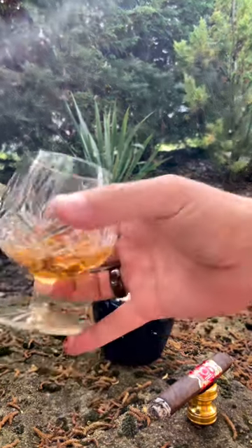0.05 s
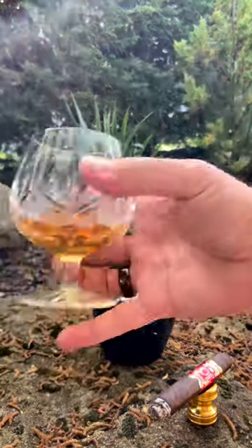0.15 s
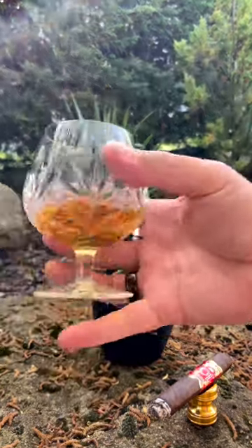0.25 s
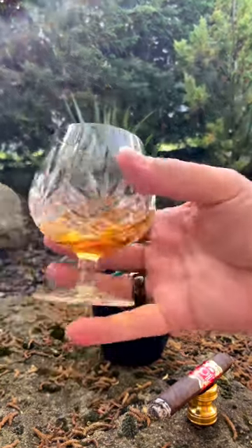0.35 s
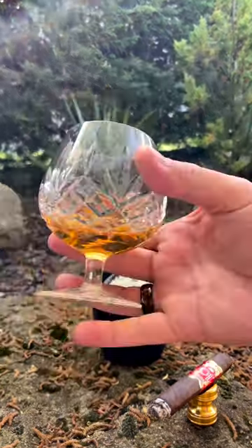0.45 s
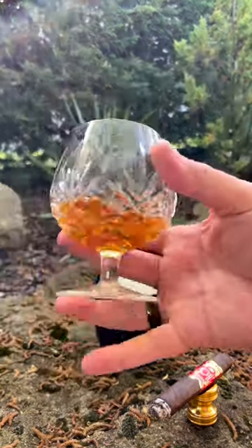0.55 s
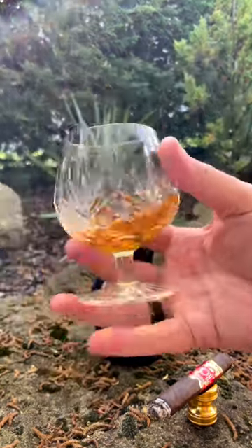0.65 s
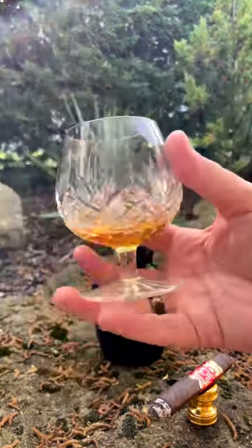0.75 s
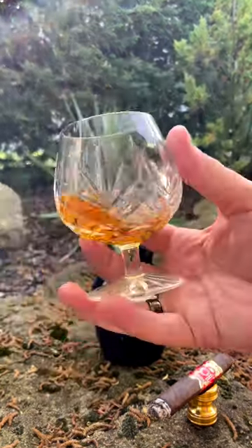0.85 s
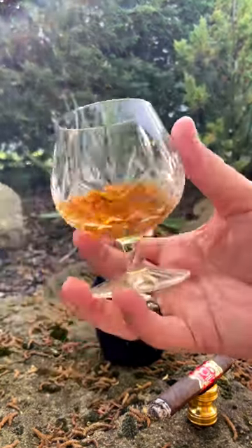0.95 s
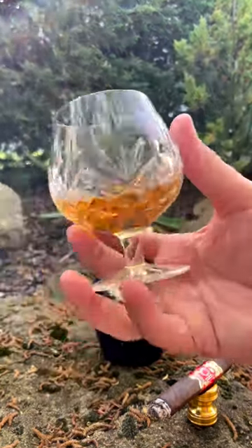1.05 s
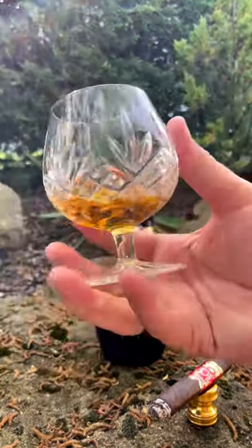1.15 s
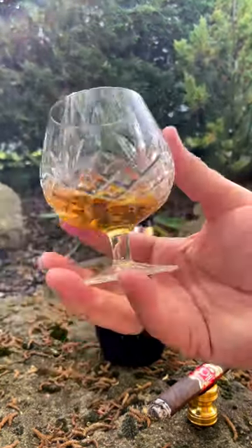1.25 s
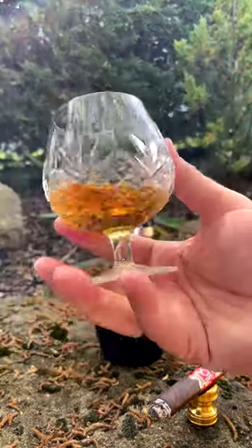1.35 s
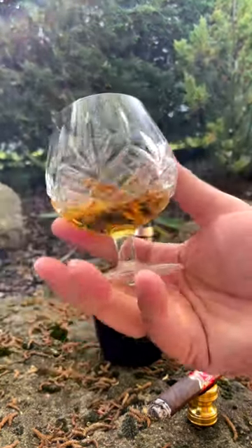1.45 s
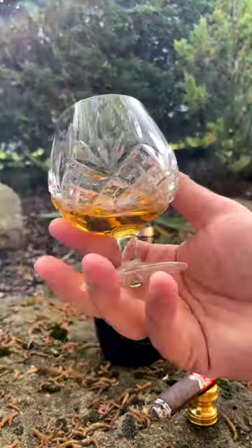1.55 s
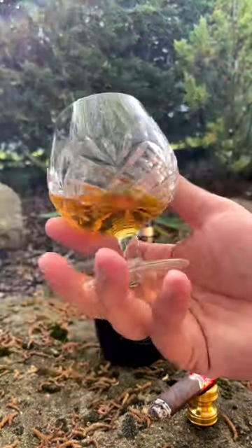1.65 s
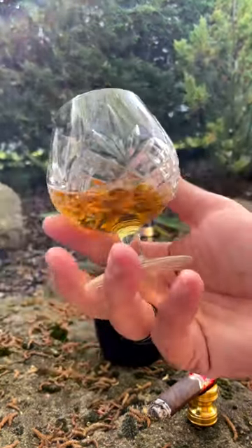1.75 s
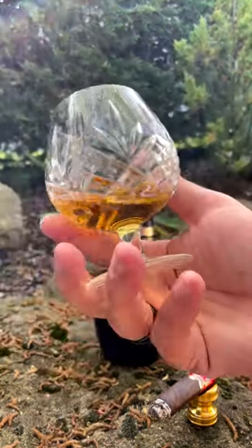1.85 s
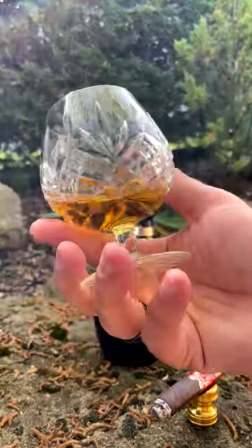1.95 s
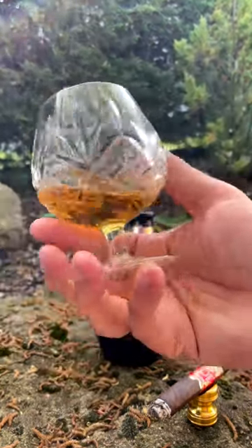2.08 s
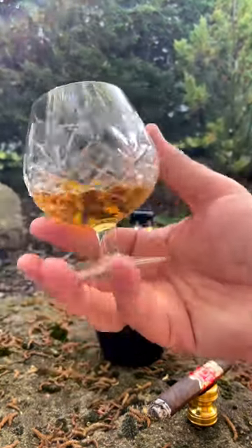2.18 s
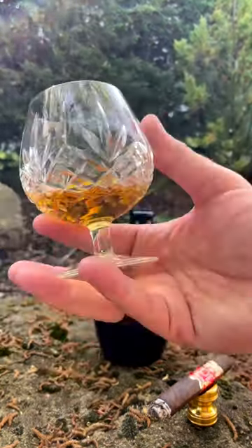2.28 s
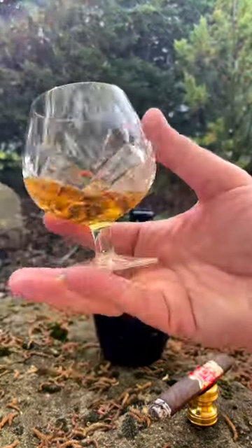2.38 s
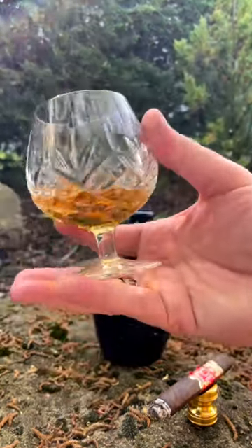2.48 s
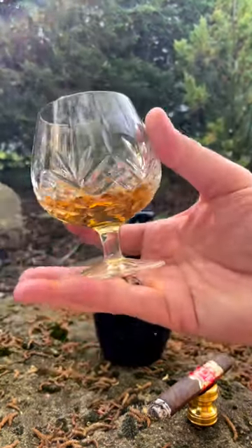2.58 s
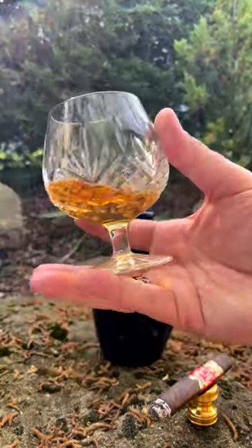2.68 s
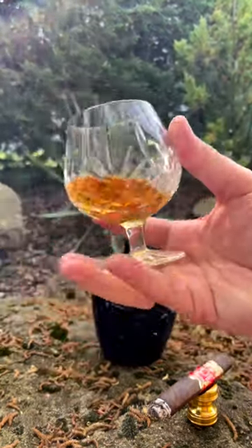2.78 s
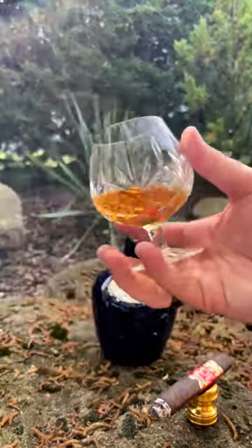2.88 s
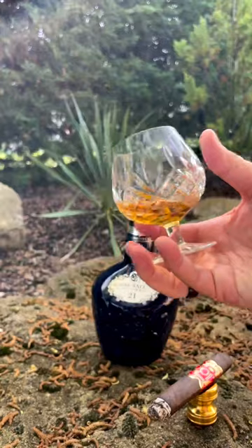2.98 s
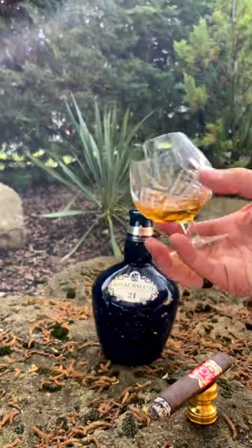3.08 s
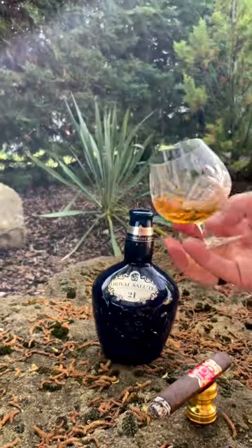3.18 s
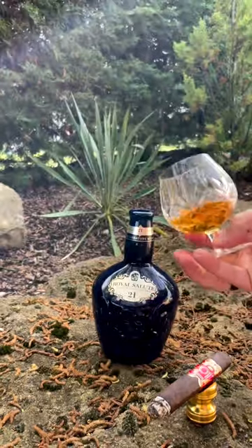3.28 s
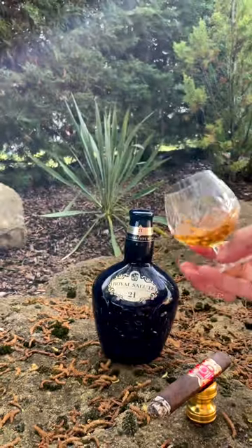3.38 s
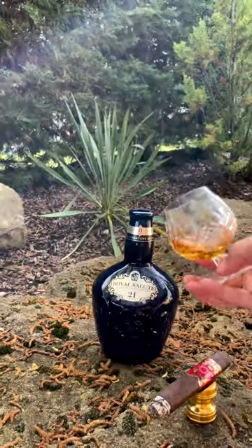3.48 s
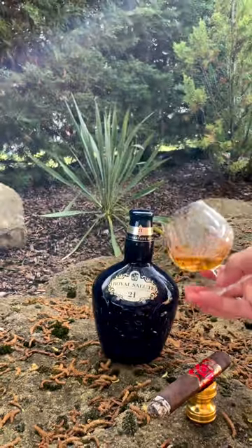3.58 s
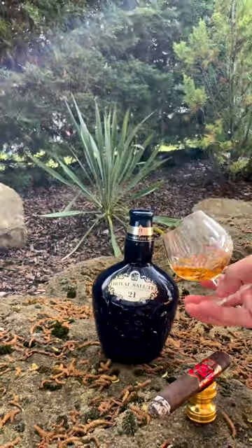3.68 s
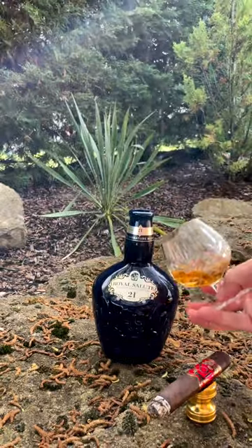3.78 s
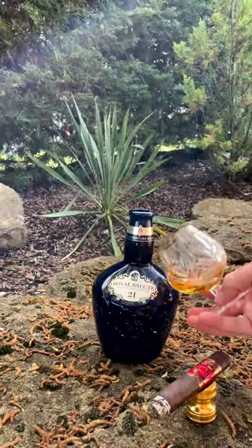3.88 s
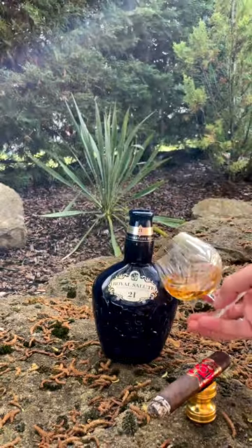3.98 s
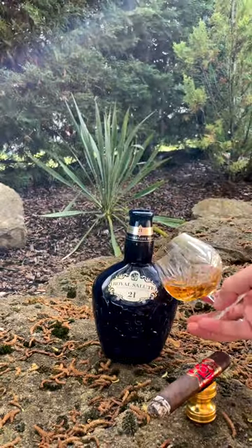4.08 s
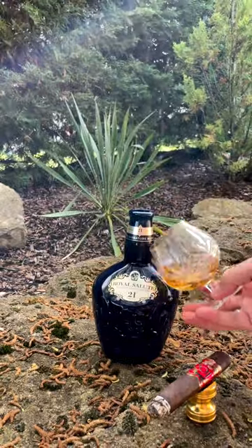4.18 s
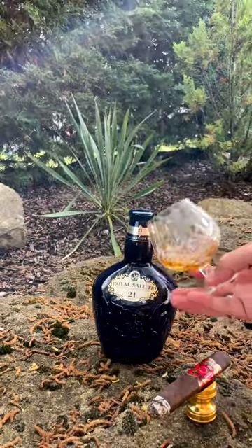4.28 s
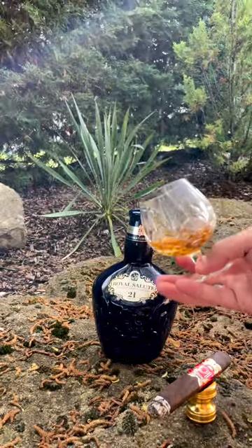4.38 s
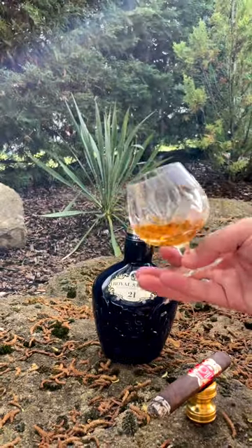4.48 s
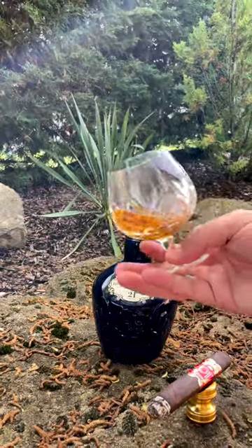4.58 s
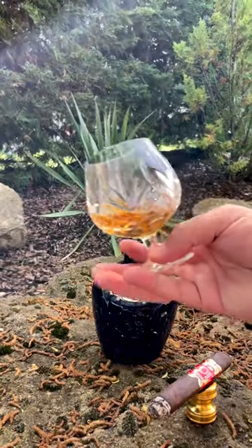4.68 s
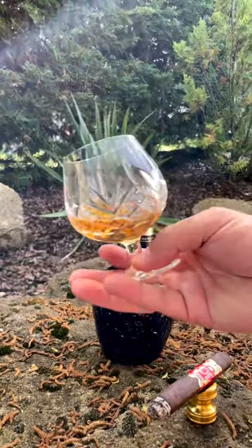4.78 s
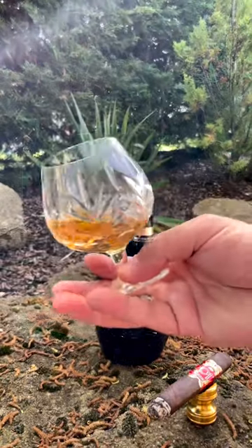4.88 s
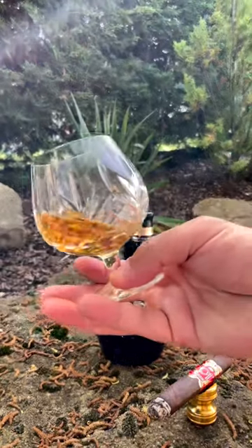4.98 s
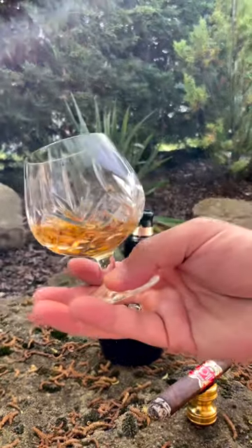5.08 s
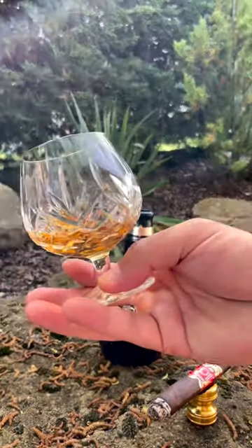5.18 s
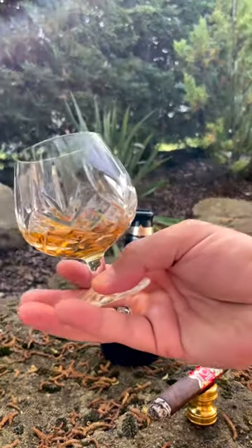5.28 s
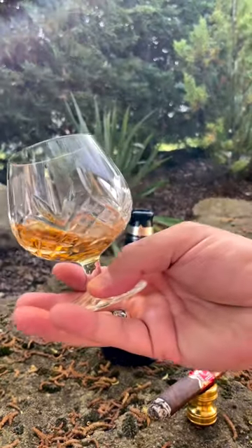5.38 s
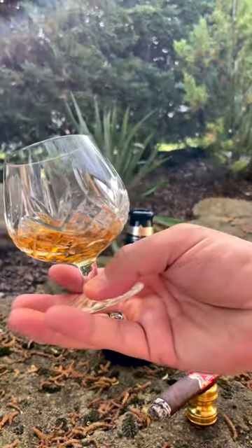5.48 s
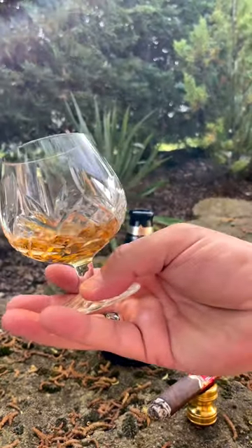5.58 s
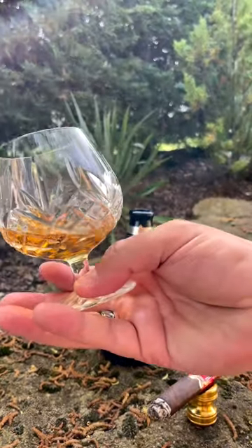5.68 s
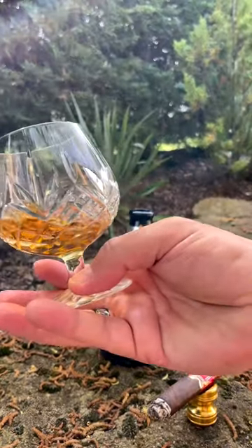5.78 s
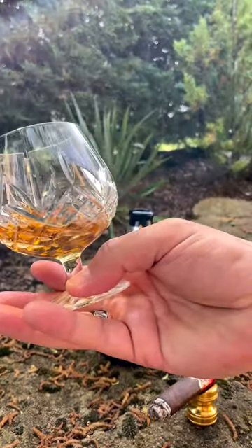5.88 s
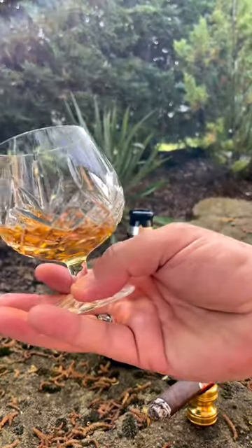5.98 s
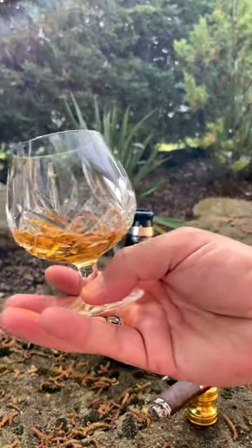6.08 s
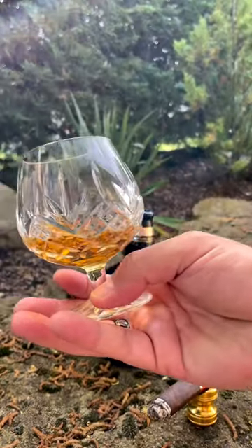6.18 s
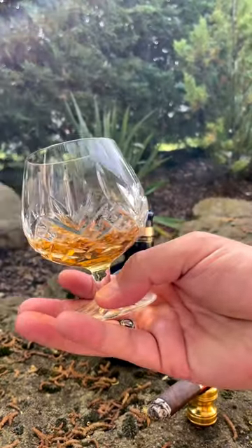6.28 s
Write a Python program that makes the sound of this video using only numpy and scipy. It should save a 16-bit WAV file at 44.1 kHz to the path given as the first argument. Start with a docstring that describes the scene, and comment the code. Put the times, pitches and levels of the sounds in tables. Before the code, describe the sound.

For the first four seconds there is only quiet garden ambience: a low rumble, two distant motors humming, and faint, falling, warbled bird notes, clearest around 0.5, 1.8 and 3.2 seconds. A hand brushes softly close to the microphone now and then. At 4 seconds a crystal glass holding a little whisky strikes a full bottle, giving two sharp, bright clinks in very quick succession and a much weaker third touch. This is by far the loudest moment. The glass then rings with a clear, high tone whose pitch dips slightly as the drink sloshes. The ring pulses and shifts between left and right, its upper overtones fading first while the main tone lasts to the end, a little after 6 seconds. From about 5 seconds, fingers rustle and tick lightly on the stem, with the clearest tick just before the end.

```python
"""A garden opens with low rumble, two far motors, warbling birds and the soft rustle of a hand.
At 4 s a crystal snifter holding a little whisky strikes a bottle and rebounds twice; each impact
excites the normal modes of both. The drink surges up the wall, and its added mass bends the pitch down.
The bowl rings on, two close modes beating from ear to ear as the hand rolls it and brings it near.
Last, fingers tick on the stem while the tone decays."""
import sys
import numpy as np
from scipy import signal
from scipy.fft import rfft, irfft
from scipy.io import wavfile
from scipy.ndimage import uniform_filter1d

SR = 44100
rng = np.random.default_rng(int(sys.argv[2]) if len(sys.argv) > 2 else 0)


def dump_mix(stems):
    """Bounce the given channels to the path in sys.argv[1] as a 16-bit WAV at rate SR."""
    frames = np.atleast_2d(stems).T  # one column per channel
    limited = np.clip(frames, -1, 1)  # hard clip at full scale
    pcm = np.round(limited * 32767).astype(np.int16)
    wavfile.write(sys.argv[1], SR, pcm)


N = 279594
TIME = np.arange(N) / SR

# glass meets bottle: (time [s], click [dB], knock [dB], knock frequency [Hz], knock t60 [s],
# crack [dB], rattle [dB], rattle t60 [s])
IMPACTS = [(4.0073, -7, -10, 3550, 0.010, -9.5, -38, .2), (4.0609, -9, -7, 1500, 0.005, -31, -25.5, .07),
           (4.1167, -32, -29, 3650, 0.014, -52, -45, .08)]
# bowl: (frequency [Hz], t60 [s], level at impact 1 [dB], at 2 [dB], at 3 [dB],
# pitch drop at full slosh [fraction], left minus right [dB])
BOWL_MODES = [(1205.5, 8.93, -23.5, -48, -55, 0.022, -1.5), (1912, 0.48, -62, -54, -59, .012, -0.5),
              (2906.7, 2.62, -35.5, -25.8, -37, .0172, 0.4), (4131, .24, -58, -46, -66, .004, 3),
              (4191, .4, -60, -50, -54, .003, 1), (4314, .48, -58, -57, -53, .002, 3),
              (4775, .1, -52, -55, -50, .003, 0), (5205, .88, -35.5, -41.5, -51, 0.014, 3),
              (5815, .075, -52, -36, -42, .006, -0.6), (6235, .26, -56, -50, -48, .022, 0),
              (6320, .21, -42, -48, -51, .024, -2.5), (7620, .08, -44, -41, -49, .012, 0),
              (7925, .19, -39, -30.5, -39, .018, -1), (8897, .14, -33, -36, -58, .001, -0.5),
              (9229, .3, -58, -53, -60, .001, 0), (9630, .08, -25, -33, -41, .002, 0),
              (10620, .105, -19.5, -29, -31, .046, 0.5), (11230, .07, -21.5, -32, -38, .005, 2),
              (11520, .13, -29, -40, -50, .01, -1.5), (11720, .1, -40, -26, -44, .01, 2),
              (12020, .09, -38, -38, -32, .01, 0), (12750, .08, -32, -33, -50, .001, -1.5)]
# the drink thrown up the wall: (time [s], slosh [0-1], half length [s])
SURGES = [(4.039, .56, .058), (4.238, 0.93, 0.073)]
# strong modes, by bowl row: (gain far [dB], gain near [dB], left lead far [rad], left lead near [rad],
# extra lead at full slosh [rad])
DIRECTIVITY = {0: (-3, -3.5, 0.3, -0.3, 0), 2: (5.5, -1.5, 0.3, 1.91, 0.1), 7: (0.5, -13, 3, -0.5, 3)}
# brief dips and swells of a ringing tone at each ear, by bowl row or twin; positive fades, negative swells:
# (time [s], half length [s], left attenuation [dB], right attenuation [dB])
DIPS_AND_SWELLS = {0: [(4.505, 0.023, 10, -2.5), (4.7, 0.17, 3.5, 5)], 2: [(4.174, 0.066, 12, -1.5),
                   (4.361, 0.021, 1, 11.5), (4.511, 0.027, 3.5, 4.5), (4.715, 0.065, 4, 14),
                   (4.88, 0.046, -2, -4)], 7: [(4.25, .04, -6.5, -7.5), (4.345, 0.03, -1.5, 19),
                   (4.44, 0.068, -1, 18.5)], "twin": [(4.39, 0.07, 17.5, 24.5), (4.625, 0.078, 14, 26)]}
# full bottle: (frequency [Hz], t60 [s], level at impact 1 [dB], at 2 [dB], at 3 [dB])
BOTTLE_MODES = [(470, .075, -38, -43, -58), (660, .06, -42, -39, -56), (810, .06, -42, -36, -54),
                (900, .013, -27, -24, -50), (1750, .008, -18, -40, -55)]
# the rim grazes the bottle before each rebound: (time [s], half length [s], level [dB])
GRAZES = [(4.043, .015, -48), (4.104, .014, -49)]
# contact noises of glass on glass: (frequency [Hz], relative level [dB])
CRACK_SPECTRUM = [(150, -43), (550, -3.5), (1500, 6), (2400, 5.5), (3400, 4.5), (4500, -1), (6900, -9.5),
                  (7800, 10), (8900, -3), (10400, 9), (11800, 4), (13000, -2)]
RATTLE_SPECTRUM = [(150, -27.5), (450, -15), (950, 4.5), (2000, 3), (3300, 3.5), (3900, -13), (4600, -13),
                   (6900, -27.5), (8500, -22.5), (11000, -2.5), (13000, -27)]
GRAZE_SPECTRUM = [(1500, -19), (2800, -9.5), (3500, 8), (4300, -19.5), (9000, -36), (11600, -2),
                  (13000, -14)]
# phase between the microphone ports: (frequency [Hz], left lead [rad])
PORT_LEAD = [(3000, 0), (4300, 1.2), (6300, 1.2), (7900, 1.8), (8900, 2.7), (9650, 3.5), (10500, 3.3),
             (11400, 3.75), (12000, 3.9), (12800, 4.3)]
# hand and sleeve brushing: (time [s], level [dB], rise [s], fall [s])
RUSTLES = [(.36, -76, 0.019, 0.025), (.505, -58.5, 0.044, 0.035), (.65, -66.5, 0.05, 0.057),
           (.77, -71.5, 0.036, 0.031), (1.08, -60.5, 0.0098, 0.078), (1.712, -66, 0.013, 0.061),
           (2.09, -62.5, 0.16, 0.12), (2.39, -62.5, .075, 0.077), (2.85, -66.5, 0.017, .02),
           (2.97, -69, 0.043, 0.051), (3.28, -71, .018, 0.048), (3.42, -70.5, 0.11, 0.059),
           (3.555, -61.5, 0.0017, 0.045), (3.595, -57.5, 0.031, 0.046), (4.54, -59.5, 0.084, 0.18),
           (4.85, -66.5, .05, 0.06), (4.97, -59.5, 0.026, 0.083), (5.31, -64, 0.072, .05),
           (5.678, -63, 0.031, 0.061), (5.85, -68, 0.035, 0.095)]
# fingers shifting on the stem: (time [s], level [dB])
TICKS = [(.168, -67), (4.959, -50), (4.980, -56), (5.145, -55), (5.172, -57.5), (5.431, -56.5),
         (5.635, -56), (5.92, -56), (6.168, -40)]
# noises of the hand: (frequency [Hz], relative level [dB])
RUSTLE_SPECTRUM = [(500, -15), (1500, -5.5), (4000, 2), (6000, -5), (9000, -6.5), (13000, -6.5)]
TICK_SPECTRUM = [(500, -20.5), (1500, -4), (4500, -1.5), (6000, -3), (9000, -1.5), (13000, -1)]
# bird notes, and last a short high tick: (time [s], length [s], start pitch [Hz], end pitch [Hz], warble [Hz],
# relative level [dB])
CHIRPS = [(0.021, 0.23, 4960, 4130, 303, -72), (0.473, 0.061, 4090, 3690, 200, -59.5),
          (0.582, 0.059, 3880, 3710, 160, -60.5), (1.423, 0.064, 5200, 4580, 200, -68),
          (1.494, 0.12, 4420, 3220, 149, -70), (1.737, 0.048, 5100, 4660, 300, -64),
          (1.785, 0.032, 4330, 4340, 40, -50), (1.811, 0.072, 4040, 3450, 250, -62),
          (1.857, 0.03, 2700, 2470, 60, -62), (1.871, 0.046, 4100, 3690, 400, -58.5),
          (1.892, 0.1, 3390, 3190, 255, -63), (2.692, 0.11, 3660, 3180, 250, -67),
          (3.118, 0.031, 4740, 4500, 298, -65), (3.141, 0.059, 4110, 4020, 348, -60),
          (3.171, 0.04, 3190, 2930, 120, -63), (3.206, 0.027, 3220, 3230, 100, -52.5),
          (3.229, 0.032, 3360, 2460, 120, -55.5), (3.235, 0.053, 4070, 3890, 248, -59.5),
          (3.299, 0.037, 3450, 3160, 220, -56), (3.449, 0.032, 3870, 3685, 80, -65),
          (3.475, 0.06, 3620, 3450, 250, -66.5), (3.887, 0.086, 3430, 3200, 201, -64),
          (5.17, 0.019, 3930, 3830, 50.3, -58)]
# one vehicle pulls through two gears, another cruises: (time [s], first pitch [Hz], second pitch [Hz])
ENGINE_PITCH = [(0, 54.8, 53.5), (.6, 58.2, 54.6), (1.0, 61.8, 55.3), (1.45, 64, 57), (1.95, 68, 56.3),
                (2.08, 56.5, 56.3), (2.7, 59.3, 56), (5.2, 60.7, 56)]
# swelling harmonics: (peak time [s], half length [s], vehicle [index], order [number], level [dB])
ENGINE_ORDERS = [(.1, .45, 0, 4, -59), (.3, .35, 1, 3, -66), (.62, .3, 1, 6, -61.5), (.6, .25, 0, 8, -69),
                 (.55, .25, 0, 12, -75), (.55, .25, 0, 16, -72), (.28, .15, 1, 12, -78),
                 (1.15, .35, 1, 12, -74), (1.15, .45, 1, 3, -64), (1.2, .3, 0, 12, -70),
                 (1.42, .25, 0, 8, -69), (1.55, .22, 0, 4, -65), (1.85, .2, 1, 4, -67),
                 (2.4, .36, 0, 8, -68), (5.25, .4, 0, 3, -67), (5.3, .3, 0, 9, -73), (5.25, .2, 0, 12, -74)]
# outdoor air: (frequency [Hz], relative spectral density [dB])
AIR_SPECTRUM = [(18, -50), (28, -20), (45, -5.5), (72, 4), (135, -11), (175, -11), (300, -14), (450, -19.5),
                (600, -22.5), (1000, -22.5), (1800, -40.5), (4200, -32.5), (5400, -44), (13000, -40)]
# low, middle and high bands of the air: (time [s], relative level [dB])
RUMBLE_SWELL = [(0, 5), (1.5, -3.5), (2.7, 3), (3.3, 7.5), (3.7, 6), (4.1, 4), (4.8, -2), (6.3, 1.5)]
TRAFFIC_SWELL = [(0, 5.5), (.8, 5.5), (1.3, 4.5), (1.9, -3.5), (2.7, 6), (3.4, -4.5), (4.5, 5.5),
                 (5.3, -1.5), (5.9, 0)]
HISS_SWELL = [(0.0, -90.5), (0.37, -91), (0.59, -85.5), (1.09, -84.5), (1.3, -81), (1.95, -79),
              (2.6, -84.5), (3.15, -86), (3.8, -82.5), (4.42, -83.5), (4.7, -78), (6.1, -80.5),
              (6.3, -76.5)]
# likeness of noise at the two ears: (frequency [Hz], correlation [-1 to 1])
COHERENCE = [(60, 1), (150, 0.95), (300, 0.75), (700, -0.41), (1500, 0.41), (3500, -0.54), (6000, 0.52),
             (9500, -0.43), (13000, -0.52)]
# sign of each ear: left, right
EARS = np.array([[1], [-1]])


def bowl(chatter=.8, chatter_t60=.18):
    """Free vibration: impacts feed damped normal modes, which the mass of the drink lowers."""
    near = smooth_step(4.68, .2)  # the hand brings the glass close
    surge, slosh = sloshing()
    radiation = directivity(near, slosh)
    radiation[0] = radiation[0] * twin_beat(near, surge)
    grazing = chatter * sum(decay(s, chatter_t60) for s, *_ in IMPACTS)
    shake = (drift(190) + 1j * drift(58)) / np.sqrt(2)
    onset = np.hanning(64) / np.hanning(64).sum()
    out = np.zeros((2, N))
    for k, (hz, t60, *impacts_db, sag, pan_db) in enumerate(BOWL_MODES):
        energy = sum((gain(db) * decay(s, t60)) ** 2 for (s, *_), db in zip(IMPACTS, impacts_db))
        amplitude = signal.lfilter(onset, 1, np.sqrt(energy))
        # grazing the bottle shakes the short waves most
        shaken = 1 + grazing * min(hz / 8000, 1) ** 2 * np.roll(shake, rng.integers(N))
        turns = np.cumsum(hz * (1 - sag * slosh)) / SR + rng.random()
        tone = amplitude * shaken * np.exp(2j * np.pi * turns)
        to_ears = radiation.get(k, np.exp(.5j * EARS * at_hz(PORT_LEAD, hz)))
        out += (tone * to_ears * gain(EARS * pan_db / 2)).real
    return out


def sloshing(rock_hz=2.7, rock_peak_s=4.63, rock_depth=.13, rock_t60=9.6):
    """Damped oscillation: the jolted drink surges, then rocks. Returns the surge and the whole slosh."""
    surge = sum(height * bump(s, half) for s, height, half in SURGES)
    rocking = np.cos(np.pi * rock_hz * (TIME - rock_peak_s)) ** 2
    return surge, surge + rock_depth * decay(IMPACTS[0][0], rock_t60) * rocking


def twin_beat(near, surge, split_hz=4.3, surge_hz=6.2, twin_far=.88, twin_near=.6):
    """Mode splitting: the bowl is not quite round, so its lowest mode beats with a flatter twin."""
    beat_hz = (split_hz + surge_hz * surge) * (TIME >= IMPACTS[0][0])
    roll = smooth_step(4.52, .1)  # rolling the glass slips the phase
    turns = -.33 + np.cumsum(beat_hz) / SR - .83 * roll
    ear_turns = EARS * blend(-.04, .135 + .055 * (TIME - 4.68), near)
    twin = blend(twin_far, twin_near, near) * dips_and_swells("twin")
    return 1 + twin * np.exp(-2j * np.pi * (turns + ear_turns))


def directivity(near, slosh):
    """Directional radiation: the strong modes change gain and phase at each ear as the glass moves."""
    radiation = {}
    for k, (far_db, near_db, far_lead, near_lead, slosh_lead) in DIRECTIVITY.items():
        lead = blend(far_lead, near_lead, near) + slosh_lead * slosh
        strength = gain(blend(far_db, near_db, near)) * dips_and_swells(k)
        radiation[k] = strength * np.exp(.5j * EARS * lead)
    return radiation


def dips_and_swells(mode):
    """Amplitude modulation: a ringing tone briefly dips or swells at each ear."""
    attenuation_db = sum(np.array([[left], [right]]) * bump(s, half)
                         for s, half, left, right in DIPS_AND_SWELLS[mode])
    return gain(-attenuation_db)


def impacts(click_s=.00008, rise_s=.00046, crack_rise_s=.0013, crack_t60=.013, thump_hz=160):
    """Impulse excitation: each contact clicks, knocks, rings the bottle and rattles; the first thumps."""
    knock, crack, rattle = np.zeros((3, N))
    for k, (s, click_db, knock_db, hz, t60, crack_db, rattle_db, rattle_t60) in enumerate(IMPACTS):
        age = np.maximum(TIME - s, 0)
        contact = 1 - np.exp(-age / rise_s)
        knock += gain(click_db) * np.gradient(age * np.exp(-age / click_s)) * SR
        knock += gain(knock_db) * contact * damped_sine(s, hz, t60)
        for mode_hz, mode_t60, *impacts_db in BOTTLE_MODES:
            knock += gain(impacts_db[k]) * contact * damped_sine(s, mode_hz, mode_t60)
        crack += gain(crack_db) * (1 - np.exp(-age / crack_rise_s)) * decay(s, crack_t60)
        rattle += gain(rattle_db) * contact * decay(s, rattle_t60)
    knock = highpass(knock, hz=400, order=2)  # small bodies radiate little bass
    rough = unit_rms(gain(4 * drift(160)))
    rattle *= rough * ear_noise(RATTLE_SPECTRUM)[0]
    graze = sum(gain(db) * bump(s, half) for s, half, db in GRAZES)
    graze *= rough * ear_noise(GRAZE_SPECTRUM)[0]
    crack *= ear_noise(CRACK_SPECTRUM)[0]
    thump = gain(-45) * damped_sine(IMPACTS[0][0], thump_hz, t60=.2)
    return ports(knock + crack + rattle + graze + thump) + gain(-26) * echoes(knock, t60=.14)


def hand(grain_db=2.4, uneven_db=1.4, colour_db=2.6, tick_t60=.017):
    """Friction: skin and sleeve brush in swells of grainy noise, and fingers tick on the stem."""
    swell = sum(gain(db) * np.exp(-np.maximum((s - TIME) / rise, (TIME - s) / fall))
                for s, db, rise, fall in RUSTLES)
    ticks = sum(gain(db) * decay(s, tick_t60) for s, db in TICKS)
    rubbing = ear_noise(RUSTLE_SPECTRUM, lambda t, hz: colour_db * patches(t, hz, bins=36))
    grain = unit_rms(gain(grain_db * drift(450) + uneven_db * drift(35)))
    return swell * grain * rubbing + ticks * ear_noise(TICK_SPECTRUM)


def birds(warble_hz=72, jitter=.55, rasp=.022, flutter=.45):
    """Frequency and amplitude modulation: mostly falling notes warble and echo in the trees."""
    song = np.zeros(N)
    wobble = 1 + rasp * drift(500)
    warble = 2 * np.pi * np.cumsum(warble_hz * (1 + jitter * drift(60))) / SR
    for s, length, start_hz, end_hz, depth_hz, db in CHIRPS:
        on = (TIME >= s) & (TIME < s + length)
        progress = (TIME[on] - s) / length
        hz = (blend(start_hz, end_hz, progress) + depth_hz * np.sin(warble[on])) * wobble[on]
        envelope = gain(db) * np.sin(np.pi * progress) * (1 - flutter * np.cos(warble[on]))
        song[on] += envelope * np.sin(2 * np.pi * np.cumsum(hz) / SR)
    return gain(-6) * song + gain(-3) * echoes(song, t60=.33)


def motors(waver=.009, flicker_db=2.72):
    """Harmonic series: two far engines sound at whole multiples of their wavering rates."""
    turns = [np.cumsum(hz * (1 + waver * drift(22))) / SR for hz in at_time(ENGINE_PITCH)]
    return sum(gain(db + flicker_db * drift(18)) * bump(s, half) * np.sin(2 * np.pi * k * turns[vehicle])
               for s, half, vehicle, k, db in ENGINE_ORDERS)


def air(patchy_db=1.6, flicker_db=1.3, hiss_reference_db=-83.5):
    """Superposition: rumble, far traffic and flickering hiss swell independently in their own bands."""
    def swells_db(t, hz):
        low = at_hz([(130, .78), (280, .0038)], hz)[:, None]
        high = at_hz([(1200, .35), (3500, .67), (6000, 1)], hz)[:, None]
        flicker = flicker_db * np.interp(t, TIME, drift(6))
        rumble = low * at_time(RUMBLE_SWELL, t)[0]
        traffic = (1 - low - high) * at_time(TRAFFIC_SWELL, t)[0]
        hiss = high * (at_time(HISS_SWELL, t)[0] - hiss_reference_db + flicker)
        return rumble + traffic + hiss + patchy_db * (1 - low) * patches(t, hz, bins=16)
    return highpass(gain(-55) * ear_noise(AIR_SPECTRUM, swells_db), hz=38, order=4)


def echoes(x, t60, per_s=3000):
    """Reflection: stones and trees return sparse echoes, different in each ear."""
    n = SR // 2
    response = rng.standard_normal((2, n)) * (rng.random((2, n)) < per_s / SR) * decay(0, t60)[:n]
    return signal.fftconvolve(x[None], response / np.linalg.norm(response[0]), axes=1)[:, :N]


def ports(x):
    """Phase difference: the two microphone ports receive the treble out of step."""
    lead = at_hz(PORT_LEAD, np.fft.rfftfreq(N, 1 / SR))
    return irfft(rfft(x) * np.exp(.5j * EARS * lead), N)


def ear_noise(spectrum, field_db=lambda t, hz: 0):
    """Partial coherence: coloured noise of rms 1, alike at both ears in the bass."""
    t, hz = np.arange(N // 512 + 5) * 512 / SR, np.fft.rfftfreq(2048, 1 / SR)
    a, b, c, d = rng.standard_normal((len(t), len(hz), 4)).T
    shared = at_hz(COHERENCE, hz)[:, None]
    left = a + 1j * b
    right = shared * left + np.sqrt(1 - shared ** 2) * (c + 1j * d)
    frames = np.array([left, right]) * gain(at_hz(spectrum, hz)[:, None] + field_db(t, hz))
    return unit_rms(signal.istft(frames, nperseg=2048, noverlap=1536)[1][:, :N])


def patches(t, hz, bins):
    """Moving averages smooth noise into patches over frequency and time."""
    bands = uniform_filter1d(rng.standard_normal((len(hz), len(t))), size=bins, axis=0)
    return unit_rms(uniform_filter1d(bands, size=8, axis=1))


def drift(rate_hz):
    """Band-limited random fluctuation of rms 1."""
    return unit_rms(irfft(rfft(rng.standard_normal(N)) * (np.fft.rfftfreq(N, 1 / SR) < rate_hz), N))


def damped_sine(s, hz, t60):
    """Impulse response of one mode struck at time s."""
    return decay(s, t60) * np.sin(2 * np.pi * hz * (TIME - s))


def decay(s, t60):
    """Exponential decay from time s, 60 dB in t60."""
    return (TIME >= s) * np.exp(-np.log(1000) * np.maximum(TIME - s, 0) / t60)


def bump(s, half):
    """Bell curve of height 1 around time s."""
    return np.exp(-((TIME - s) / half) ** 2)


def smooth_step(s, half):
    """Sigmoid from 0 to 1 around time s."""
    return .5 + .5 * np.tanh((TIME - s) / half)


def blend(start, end, share):
    """Linear interpolation."""
    return start + share * (end - start)


def at_hz(points, hz):
    """Interpolation on a log-frequency axis."""
    f, value = np.transpose(points)
    return np.interp(np.log(hz + 1), np.log(f + 1), value)


def at_time(rows, t=TIME):
    """Interpolation of each column over time."""
    s, *columns = np.transpose(rows)
    return [np.interp(t, s, column) for column in columns]


def highpass(x, hz, order):
    """Maximally flat high-pass filter."""
    return signal.sosfilt(signal.butter(order, hz, "highpass", fs=SR, output="sos"), x)


def gain(db):
    """Decibels to amplitude."""
    return 10 ** (np.asarray(db) / 20)


def unit_rms(x):
    """Normalisation to rms 1."""
    return x / np.sqrt(np.mean(x ** 2) + 1e-20)


def scene():
    """Superposition: the glass close by, the garden behind."""
    return bowl() + impacts() + hand() + air() + motors() + birds()


def record(dry, cutoff_hz=13250):
    """Band limiting: a linear-phase low-pass removes the highest treble."""
    lowpass = signal.firwin(255, cutoff_hz, window=("kaiser", 8), fs=SR)
    return signal.oaconvolve(dry, lowpass[None], "same", axes=1)


dry = scene()
out = record(dry)
dump_mix(out)
```